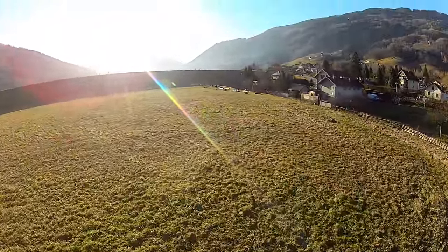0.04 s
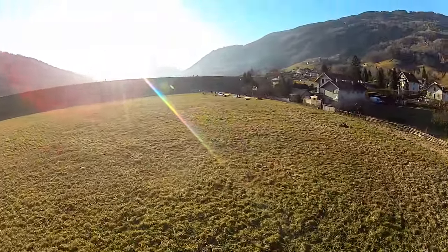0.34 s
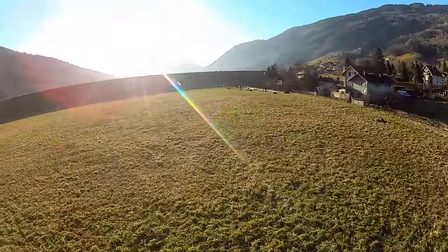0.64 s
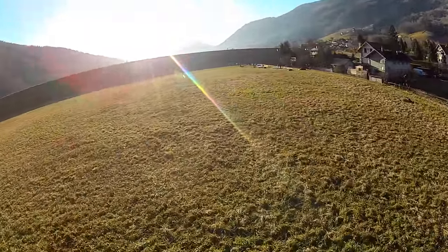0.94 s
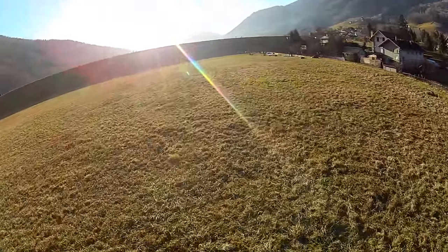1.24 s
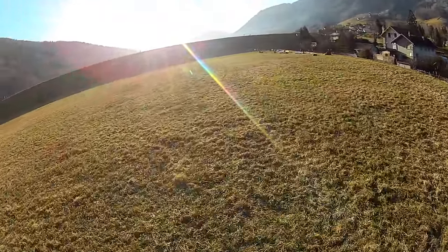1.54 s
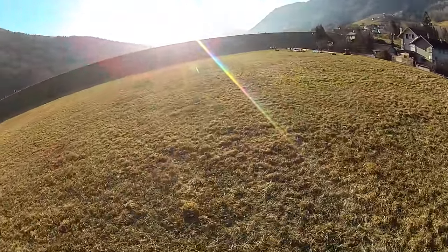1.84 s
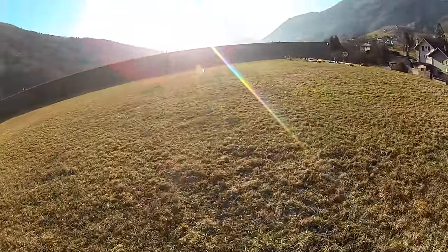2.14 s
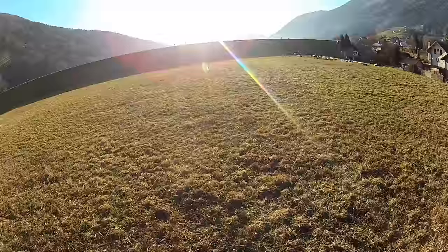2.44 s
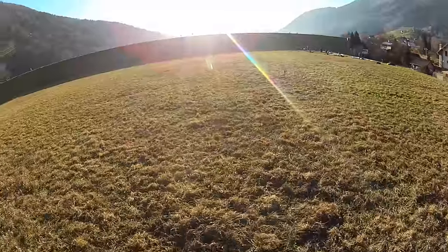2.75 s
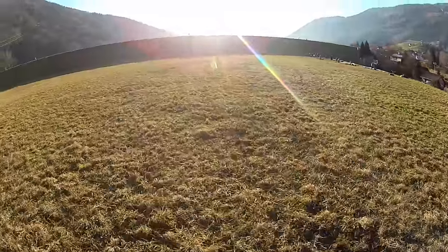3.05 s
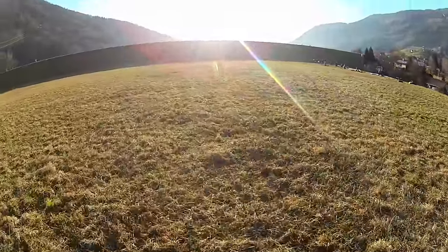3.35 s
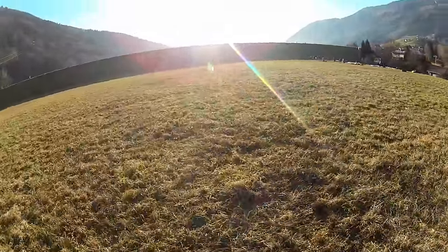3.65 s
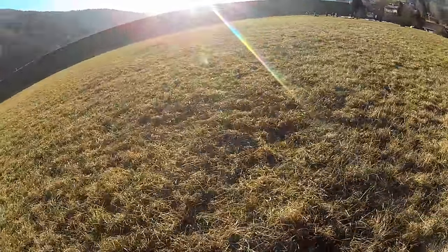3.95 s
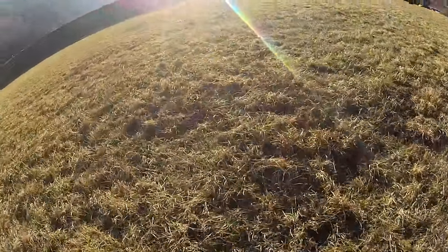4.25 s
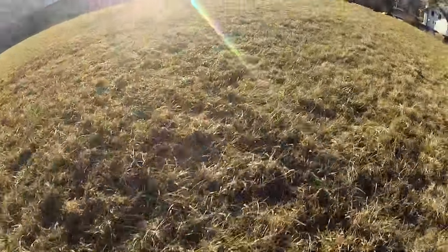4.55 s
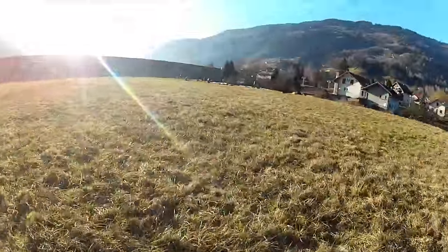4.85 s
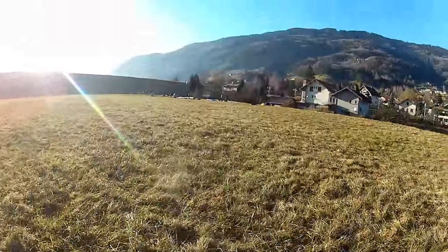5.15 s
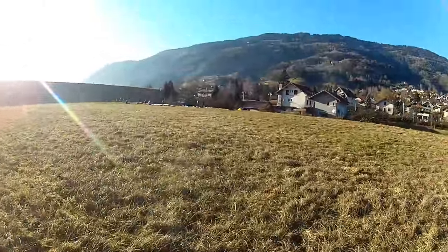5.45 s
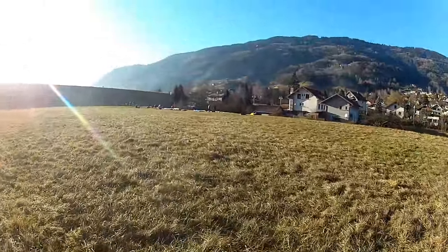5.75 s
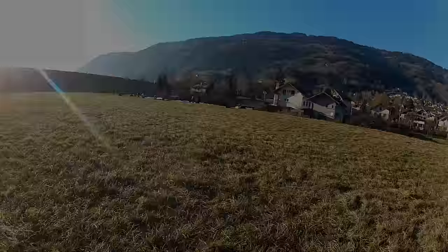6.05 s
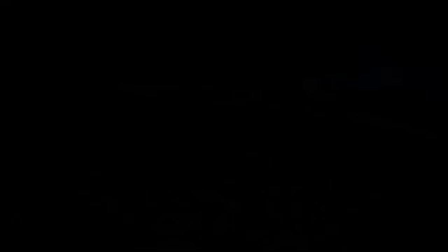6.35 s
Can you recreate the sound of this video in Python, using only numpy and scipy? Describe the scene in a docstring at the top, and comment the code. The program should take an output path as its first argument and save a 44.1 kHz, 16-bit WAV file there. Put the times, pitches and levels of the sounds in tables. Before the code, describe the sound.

Air rushes around a camera case in two swells, with a soft low roar and a few faint, thin rigging squeaks. About halfway through, a glider pilot runs out the landing in a meadow: the hiss fades while deep thumps, sharp plastic clacks and gear knocks come in an uneven run, with cloth and grass brushing past. Everything is very close to one harness-worn microphone, outdoors, with a glassy edge to the treble.

```python
"""Glider landing in a meadow

Low over the grass, from a cased action camera worn on the pilot's harness: one microphone, all close up.
Air rushes round the case and dies away, and the rigging squeaks. As the pilot runs out the landing,
steps heave the camera, its mount clacks, gear knocks, and cloth and grass brush past.
The recorder holds each sample at a low rate, which mirrors every sound into a glassy treble."""
import sys
import numpy as np
from scipy import signal
from scipy.fft import rfft, irfft
from scipy.io import wavfile

SR = 44100
rng = np.random.default_rng(int(sys.argv[2]) if len(sys.argv) > 2 else 0)


def generate_wav(sig):
    """Save sig (samples, or channels by samples) to the path in sys.argv[1] as 16-bit PCM at SR."""
    pcm = np.round(np.clip(np.atleast_2d(sig).T, -1, 1) * 32767).astype(np.int16)
    wavfile.write(sys.argv[1], SR, pcm)


N = 282221
TIME = np.arange(N) / SR

# airflow past the case, two long swells that die away in the landing: (time [s], level [dB])
AIRFLOW = [(0, -48.5), (.42, -49.5), (.49, -44), (.7, -42.5), (1.05, -48.5), (1.27, -53.5), (2.08, -54),
           (2.18, -48), (2.4, -46), (3.1, -50), (3.7, -51), (4.08, -63.5), (4.4, -60), (4.68, -65),
           (5.3, -66.5), (6.35, -65)]
# short gusts on top of it: (time of peak [s], half width [s], lift [dB])
AIR_GUSTS = [(0.028, 0.0094, 6), (.12, 0.027, 6.5), (1.44, 0.022, 3)]
# the rush of air, heard from inside the case: (frequency [Hz], level [dB])
RUSH_SPECTRUM = [(450, -24.5), (950, -12.5), (1350, -2.5), (1510, -6.5), (1650, 2.5), (1880, 0),
                 (2200, 3.5), (2550, 1.5), (2900, -11), (3450, -12.5), (4050, -25.5), (4600, -19),
                 (5800, -56)]
# eddies on the microphone, deeper near the ground: (time [s], buffeting level [dB], roar level [dB])
EDDY_LEVELS = [(0, -55, -41.5), (.65, -49.5, -45), (1.7, -56, -48), (2.55, -53, -47), (2.72, -42.5, -49),
               (3.8, -38, -51.5), (4.15, -41.5, -54), (4.4, -33.5, -54.5), (5.05, -42, -61),
               (6.35, -37, -53.5)]
# their deep buffeting and their soft roar: (frequency [Hz], level [dB])
BUFFET_SPECTRUM = [(10, -18), (26, -7.5), (42, 1), (60, -5.5), (85, -17.5), (150, -21), (230, -28.5),
                   (400, -52)]
ROAR_SPECTRUM = [(40, -10.5), (90, -5.5), (140, -3.5), (195, 1), (260, -4.5), (355, -3), (440, -10),
                 (520, -10.5), (650, -17.5), (1000, -19), (2000, -46)]
# cloth and grass brush the case: (time of peak [s], rise and fall time [s], level [dB])
CASE_BRUSHES = [(4.32, 0.056, -55), (4.41, 0.043, -50), (4.56, 0.12, -54.5), (4.92, 0.04, -53.5),
                (5.27, .008, -49.5), (5.53, 0.022, -54.5), (5.64, 0.032, -45.5), (5.995, 0.011, -45),
                (6.35, 0.042, -46)]
# cloth rustling close to the microphone: (frequency [Hz], level [dB])
RUSTLE_SPECTRUM = [(300, -5.5), (700, -7), (1050, 4), (1300, -5.5), (2000, 5.5), (2500, -4.5), (2950, -8.5),
                   (3700, 7), (4350, -16), (5100, -0.5), (5900, -15)]
# thin squeaks from the rigging: (time [s], length [s], start pitch [Hz], end pitch [Hz], level [dB])
RIGGING_SQUEAKS = [(1.009, 0.18, 3570, 3940, -58), (1.19, .11, 5400, 5600, -75),
                   (1.494, .2, 5730, 5630, -75), (1.69, 0.054, 3600, 4540, -54.5),
                   (4.52, .04, 5200, 4670, -53.5), (4.55, 0.018, 3930, 3700, -51),
                   (4.597, .026, 3730, 3680, -55.5), (4.831, 0.032, 5260, 4830, -45.5),
                   (4.902, .014, 3500, 3480, -53.5), (4.921, .016, 5070, 5100, -52.5),
                   (5.601, .01, 5160, 4930, -49), (5.664, .028, 3700, 3590, -58),
                   (5.896, 0.062, 3620, 4000, -59), (6.006, 0.0068, 5300, 5330, -46)]
# a run of tiny chirps, all of one pitch and length: (time [s], level [dB])
RIGGING_CHIRPS = [(2.372, -50), (2.43, -50), (2.58, -50), (2.622, -59), (2.685, -49.5), (2.72, -59),
                  (2.842, -61), (2.913, -59), (2.927, -56.5), (2.964, -47), (3.017, -48), (3.057, -54)]
# gear against the case: (time [s], level [dB], hardness [pitch factor], scuff [dB re hit], scuff length [s])
GEAR_KNOCKS = [(2.949, -23.5, 0.22, -14, 0.0088), (3.1246, -27, 0.22, -10, 0.012),
               (3.3976, -30, 0.23, -13, 0.014), (3.626, -27.5, 0.17, -14, .012),
               (4.271, -34, 0.6, -1, 0.036), (4.3266, -23, 0.91, -4, 0.011), (4.468, -32, 1.1, 0, 0.039),
               (4.486, -18, 1, -2, 0.013), (4.514, -22, .2, -5.5, 0.0265), (4.848, -34, 0.25, -3, 0.026),
               (4.873, -31, 0.4, -8, .007), (5.171, -31.5, .27, -7, 0.011), (5.248, -31.5, 0.24, -2, .008),
               (5.431, -34.5, 0.21, -5, .03), (5.54, -28.5, .74, 5, 0.0069), (5.548, -21, 1.01, -1, 0.012),
               (5.6, -21, .4, -12, .015), (5.63, -31, 0.75, -6, .015), (5.716, -33.5, 0.29, -4, 0.0075),
               (5.761, -13.5, 0.88, -13.5, .009), (5.798, -29, 0.27, -9, .007),
               (5.9445, -26, 1.53, -8, 0.017), (5.984, -23.5, 0.29, -8.5, 0.0072),
               (6.2633, -23.5, 0.95, 1.5, 0.0056), (6.359, -24.5, 0.75, -4, 0.024)]
# a dull knock at hardness 1: (frequency [Hz], level [dB])
KNOCK_SPECTRUM = [(50, 4), (130, 9.5), (280, -1), (550, -6), (800, -8.5), (1150, -4), (1500, -12.5),
                  (2000, -18), (3000, -20), (3700, -32), (5500, -42), (16000, -87)]
# jolts heave the camera: (time [s], level [dB], swing rate [Hz], thud [dB re swing])
CAMERA_JOLTS = [(3.006, -30, 32, -14), (3.51, -31, 37.8, -21), (3.661, -27, 37, -18),
                (3.755, -23, 38.6, -28), (4.266, -14, 42.7, -20.5), (4.363, -25, 34, -14),
                (4.515, -15, 41, -14.5), (4.868, -18, 42.8, -24), (5.181, -23, 39.4, -25),
                (5.546, -15.5, 38, -10), (5.61, -18, 32, -13), (5.657, -22.5, 48.4, -23),
                (6.009, -27.5, 40.2, -18), (6.268, -15, 33.4, -30)]
# the thud of a jolt: (frequency [Hz], level [dB])
THUD_SPECTRUM = [(40, -14), (80, -2), (150, -0.5), (300, -15.5), (700, -31), (2000, -88)]
# the mount hits its stop: (time [s], level [dB], chatter [dB re hit], chatter length [s])
MOUNT_CLACKS = [(3.0875, -19.5, -16, 0.012), (3.586, -22, 0.5, 0.0035), (3.603, -28, -7, 0.0026),
                (3.691, -19, -11.5, 0.024), (3.856, -26, -11, .003), (4.2978, -16.5, -4, 0.0095),
                (4.399, -15, -1, .0075), (4.42, -26, -12, 0.012), (4.443, -31, -6, .004),
                (4.4494, -29.5, 3, .009), (4.701, -11.5, -3.5, 0.0066), (4.744, -34.5, 2, 0.0046),
                (4.8086, -38, 1, .015), (5.0258, -24, -5.5, .015), (5.093, -31, -18, .003),
                (5.0988, -27.5, -6.5, 0.017), (5.363, -35, -15, .003), (5.512, -40, 6.5, .01),
                (5.52, -26, -2, 0.0056), (5.799, -23, -20, .003), (6.118, -18.5, -5, 0.012),
                (6.2135, -34.5, -2, .005), (6.368, -33, 1, 0.012)]
# the ring of the plastic mount, and of the tiny ticks on the ground: (frequency [Hz], level [dB])
CLACK_SPECTRUM = [(300, -40), (1200, -19.5), (1600, -10.5), (1950, 6.5), (2200, 5), (2600, -6),
                  (3400, -9.5), (4200, -22.5), (5000, -9.5), (5900, -25.5)]
TICK_SPECTRUM = [(300, -14), (1200, 0), (2200, 0), (3600, -2), (4300, -8), (5100, 2), (5900, -10)]


def gain_of(db):
    """Decibels to amplitude."""
    return 10 ** (np.asarray(db) / 20)


def unit_rms(x):
    """Scales to rms 1."""
    return x / np.sqrt(np.mean(x ** 2) + 1e-20)


def spectrum_gain(spectrum, hz):
    """A spectrum's gain at hz, interpolated in dB over log frequency."""
    points_hz, db = np.transpose(spectrum)
    return gain_of(np.interp(np.log(hz + 1), np.log(points_hz), db))


def add(mix, start_s, sound):
    """Mixes a sound in at its start time."""
    part = mix[max(round(start_s * SR), 0):][:len(sound)]
    part += sound[:len(part)]


def noise(spectrum):
    """Noise with the given spectrum, rms 1."""
    hz = np.fft.rfftfreq(N, 1 / SR)
    return unit_rms(irfft(rfft(rng.standard_normal(N)) * spectrum_gain(spectrum, hz), N))


def wander(rate_hz):
    """Smooth random drift up to about this rate, rms 1."""
    hz = np.fft.rfftfreq(N, 1 / SR)
    return unit_rms(irfft(rfft(rng.standard_normal(N)) / (1 + (hz / rate_hz) ** 2), N))


def ring(spectrum, pitch=1, size=2048):
    """How a body with this spectrum rings after one tap, peak 1."""
    hz = abs(np.fft.fftfreq(size, 1 / SR))
    log_gain = np.log(spectrum_gain(spectrum, hz / pitch))
    minimum_phase = np.exp(np.conj(signal.hilbert(log_gain)))
    response = np.fft.ifft(minimum_phase).real[:size // 2]
    return response / abs(response).max()


def strike(body, after_db, length_s, gap_s):
    """One contact, then a fading run of uneven ones from either side, all ringing the same body."""
    spacing, size, side = rng.random((3, 64))
    delay_s = np.cumsum(gap_s * (.5 + spacing))
    fade = np.exp(-delay_s / length_s) * (delay_s < length_s)
    force = np.sign(side - .5) * (.5 + size) * fade
    taps = np.zeros(SR // 10)
    index = np.minimum((delay_s * SR).astype(int), len(taps) - 1)
    np.add.at(taps, index, gain_of(after_db) * force)
    taps[0] += 1
    return signal.fftconvolve(taps, body)


def airflow_db():
    """Strength of the airflow at the case, gusts included."""
    gusts_db = sum(db * np.exp(-((TIME - peak_s) / width_s) ** 2) for peak_s, width_s, db in AIR_GUSTS)
    return np.interp(TIME, *np.transpose(AIRFLOW)) + gusts_db


def case_wind(rush_db=3, note_db=-53, note_hz=1230, note_width_hz=150, onset_db=-54, flutter_db=1.25):
    """Air hisses through the resonances of the case and blows a hollow note on it."""
    air_db = airflow_db()
    rush = gain_of(rush_db + air_db) * noise(RUSH_SPECTRUM)
    phase = 2 * np.pi * note_hz * TIME
    note = wander(note_width_hz) * np.cos(phase) + wander(note_width_hz) * np.sin(phase)
    # the note grows more slowly than the airflow and fails once the air is too slack
    excess_db = air_db - onset_db
    slope = np.where(excess_db > 0, .56, 1.6)
    hollow = gain_of(note_db + slope * excess_db) * note
    return (rush + hollow) * gain_of(flutter_db * wander(rate_hz=29))


def microphone_eddies(buffet_db=-1.5, lump_db=2, roar_db=1.5, waver_db=1.36):
    """Air tumbles right over the microphone: lumpy deep buffeting under a soft roar."""
    times, buffet_curve, roar_curve = np.transpose(EDDY_LEVELS)
    buffet = gain_of(buffet_db + np.interp(TIME, times, buffet_curve) + lump_db * wander(rate_hz=14))
    roar = gain_of(roar_db + np.interp(TIME, times, roar_curve) + waver_db * wander(rate_hz=22))
    return buffet * noise(BUFFET_SPECTRUM) + roar * noise(ROAR_SPECTRUM)


def cloth_rustle(rest_db=-69, blown_db=-16, grain_db=3):
    """Cloth rustles close by in quick grains: faintly always, more in the airflow, most at each brush."""
    brushes = sum(gain_of(db) * np.exp(-abs(TIME - peak_s) / fall_s)
                  for peak_s, fall_s, db in CASE_BRUSHES)
    blown = gain_of(blown_db + airflow_db())
    strength = np.sqrt(gain_of(rest_db) ** 2 + blown ** 2 + brushes ** 2)
    grains = gain_of(grain_db * wander(rate_hz=70))
    return strength * grains * noise(RUSTLE_SPECTRUM)


def rigging_squeaks(chirp_hz=5720, chirp_s=.014, waver_hz=240, rough_db=3):
    """Rubbing straps and lines give rough, wavering whistles: squeaks glide, chirps stay near one pitch."""
    out = np.zeros(N)
    waver = waver_hz * wander(rate_hz=500)
    roughness = gain_of(rough_db * wander(rate_hz=150))
    chirps = [(start_s, chirp_s, chirp_hz, chirp_hz, db) for start_s, db in RIGGING_CHIRPS]
    for start_s, length_s, start_hz, end_hz, db in RIGGING_SQUEAKS + chirps:
        count = round(length_s * SR)
        hz = np.linspace(start_hz, end_hz, count) + waver[round(start_s * SR):][:count]
        whistle = np.sin(2 * np.pi * np.cumsum(hz) / SR) * signal.windows.tukey(count, .5)
        add(out, start_s, gain_of(db) * unit_rms(whistle))
    return out * roughness


def gear_knocks(gap_s=.0019):
    """Padded gear bumps and scuffs against the case; softer contacts sound lower."""
    out = np.zeros(N)
    for start_s, db, hardness, scuff_db, length_s in GEAR_KNOCKS:
        body = ring(KNOCK_SPECTRUM, pitch=hardness)
        add(out, start_s, gain_of(db) * strike(body, scuff_db, length_s, gap_s))
    return out


def camera_jolts(rise_s=.014):
    """Each jolt swings the camera on the harness for a few slow cycles, with a dull thud at its start."""
    swing, thud_envelope = np.zeros((2, N))
    t = np.arange(SR // 3) / SR
    swell = t / rise_s * np.exp(1 - t / rise_s)
    for start_s, db, hz, thud_db in CAMERA_JOLTS:
        add(swing, start_s, -gain_of(db) * swell * np.sin(2 * np.pi * hz * t))
        add(thud_envelope, start_s, gain_of(db + thud_db) * swell ** 2)
    return swing + thud_envelope * noise(THUD_SPECTRUM)


def mount_clacks(gap_s=.0016):
    """Right by the microphone, the plastic mount hits its stop and chatters, never twice quite alike."""
    out = np.zeros(N)
    for start_s, db, chatter_db, length_s in MOUNT_CLACKS:
        body = ring(CLACK_SPECTRUM, pitch=rng.uniform(.98, 1.06))
        add(out, start_s, gain_of(db) * strike(body, chatter_db, length_s, gap_s))
    return out


def ground_crackle(touchdown_s=3.8, ticks_per_s=70, tick_db=-56, spread_db=5):
    """Down in the meadow, stalks and buckles add tiny ticks at random."""
    size = gain_of(tick_db + spread_db * np.minimum(rng.exponential(1, N), 3))
    ticks = size * (rng.random(N) < ticks_per_s / SR) * (TIME > touchdown_s)
    return signal.fftconvolve(ticks, ring(TICK_SPECTRUM))[:N]


def scene():
    """Open air, no room sound: everything reaches one microphone inside the case."""
    flight = case_wind() + microphone_eddies() + cloth_rustle() + rigging_squeaks()
    landing = gear_knocks() + camera_jolts() + mount_clacks() + ground_crackle()
    return (flight + landing)[None]


def record(dry, hold_hz=12000, cutoff_hz=15600, stop_s=6.372):
    """Sample and hold mirrors the sound about half the hold rate, fainter with height; then a low-pass."""
    hz = np.fft.rfftfreq(N, 1 / SR)
    anti_alias = np.clip((hold_hz / 2 - hz) / 300 + .5, 0, 1)
    narrow = irfft(rfft(dry) * anti_alias, N)
    # sampling puts an image on either side of the hold rate
    sampled = narrow * (1 + 2 * np.cos(2 * np.pi * hold_hz * TIME))
    # holding each value weights the spectrum by a sinc, with a null at the hold rate
    held = irfft(rfft(sampled) * np.sinc(hz / hold_hz), N)
    fade_out = np.clip((stop_s - TIME) / .002, 0, 1)
    low_pass = signal.firwin(255, cutoff_hz, window=("kaiser", 9), fs=SR)
    return signal.oaconvolve(held * fade_out, low_pass[None], "same")


dry = scene()
out = record(dry)
generate_wav(out)
```